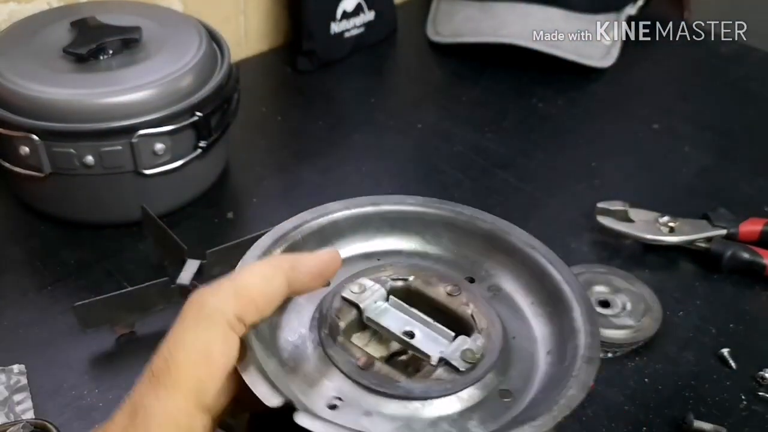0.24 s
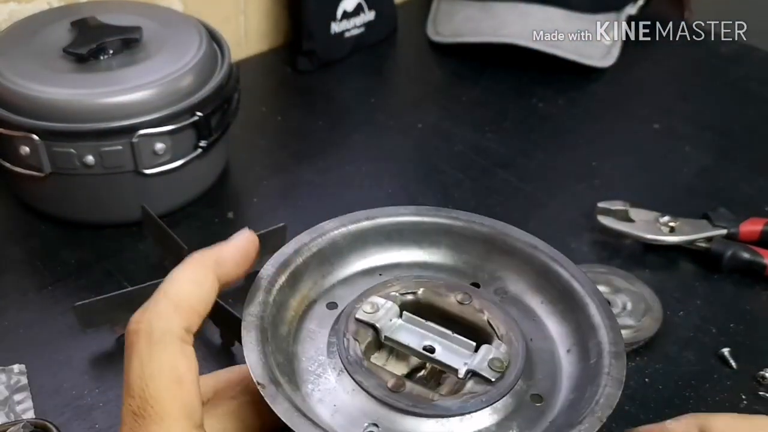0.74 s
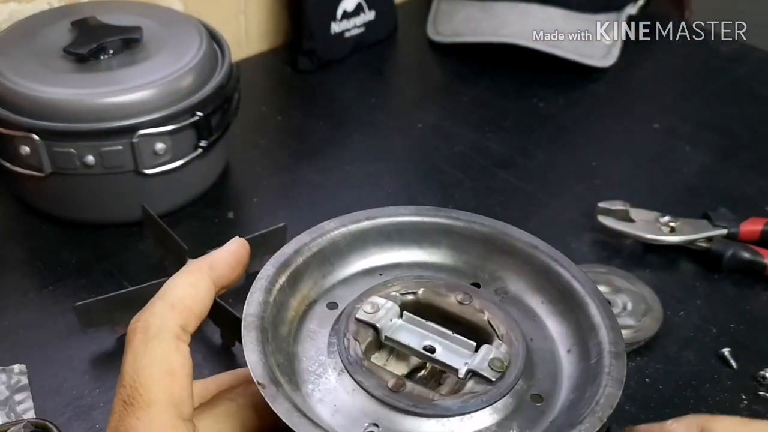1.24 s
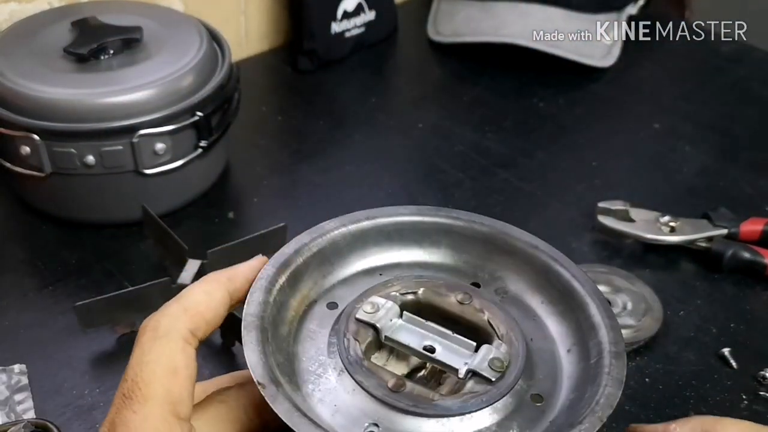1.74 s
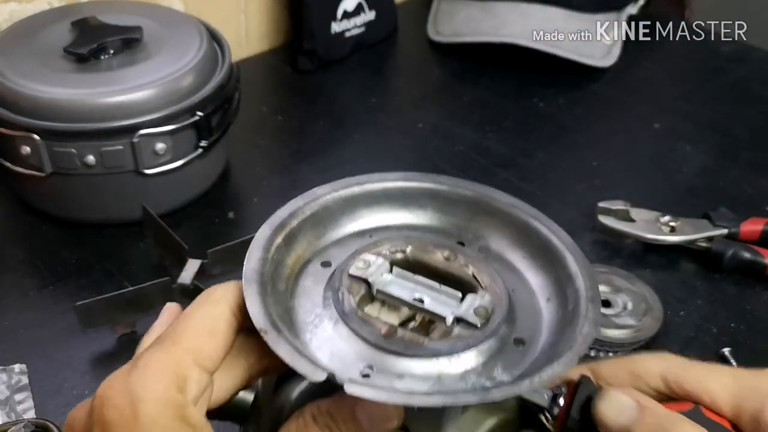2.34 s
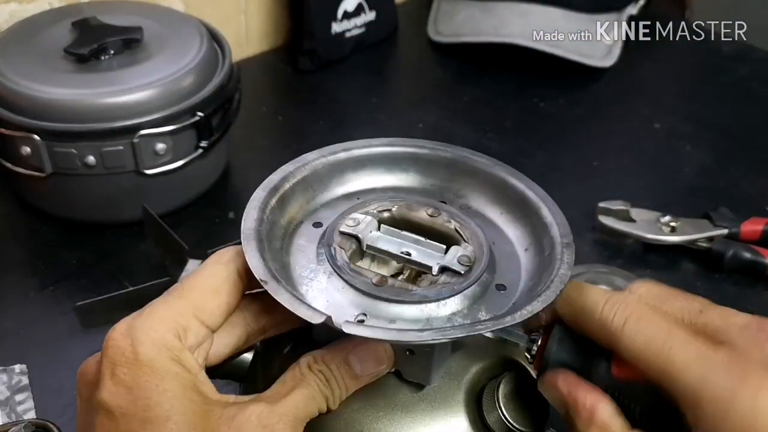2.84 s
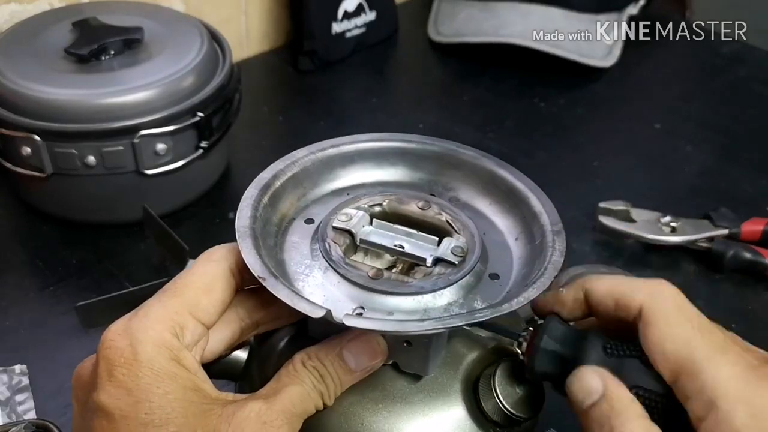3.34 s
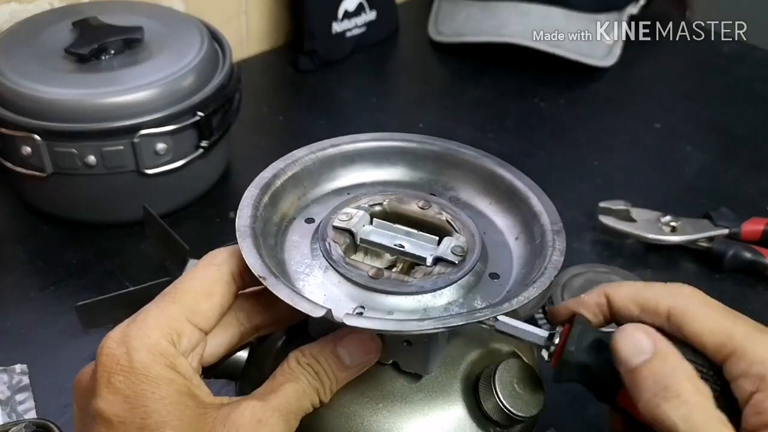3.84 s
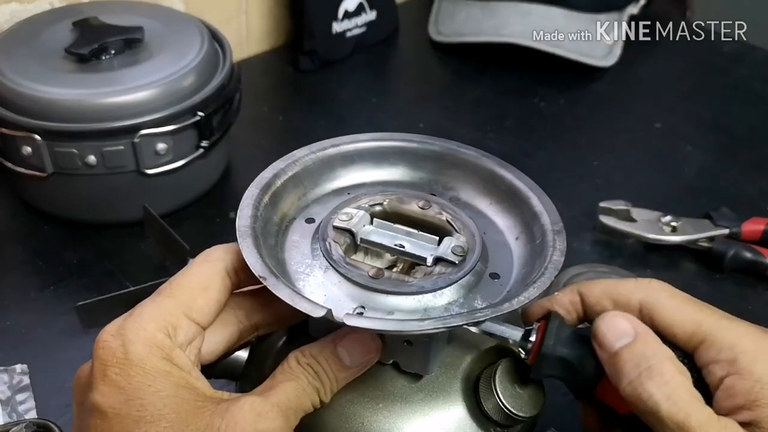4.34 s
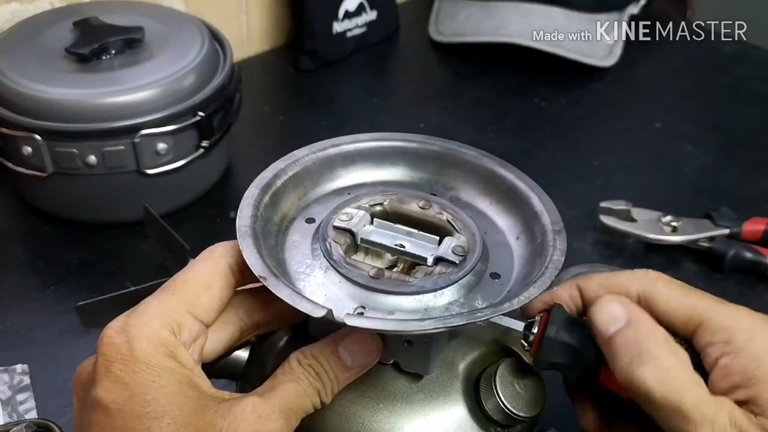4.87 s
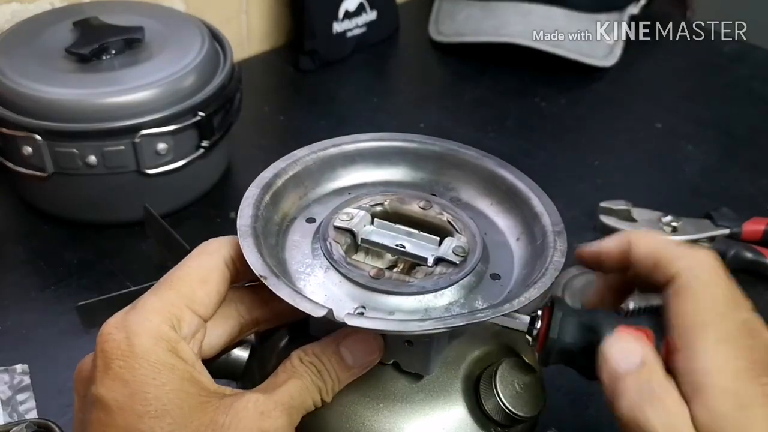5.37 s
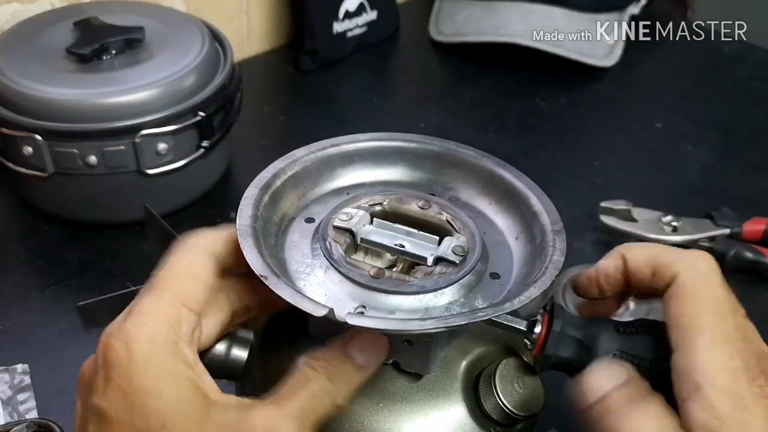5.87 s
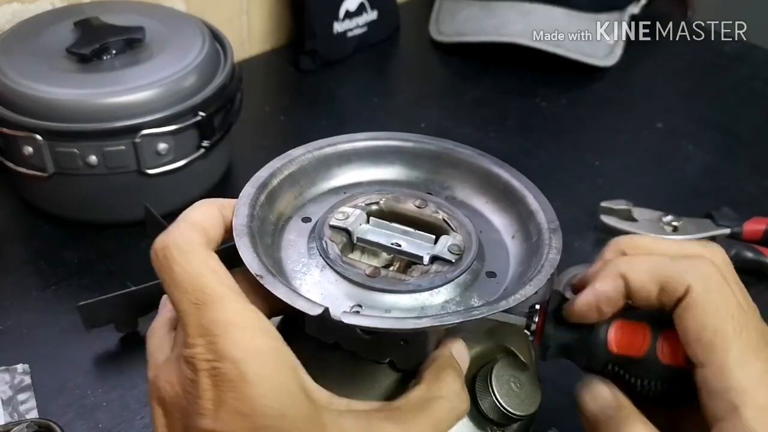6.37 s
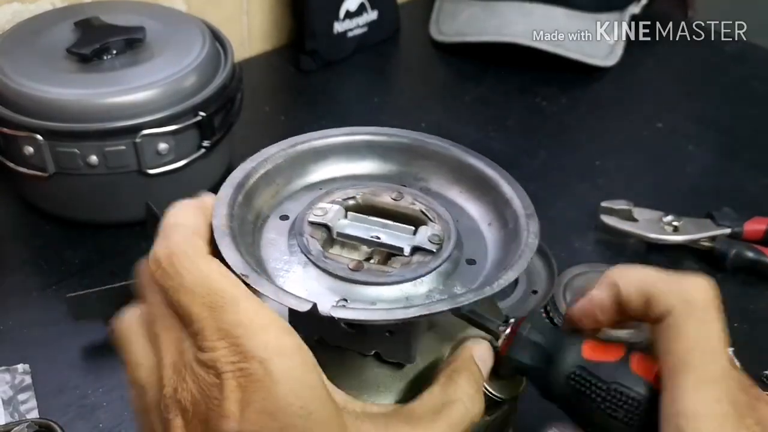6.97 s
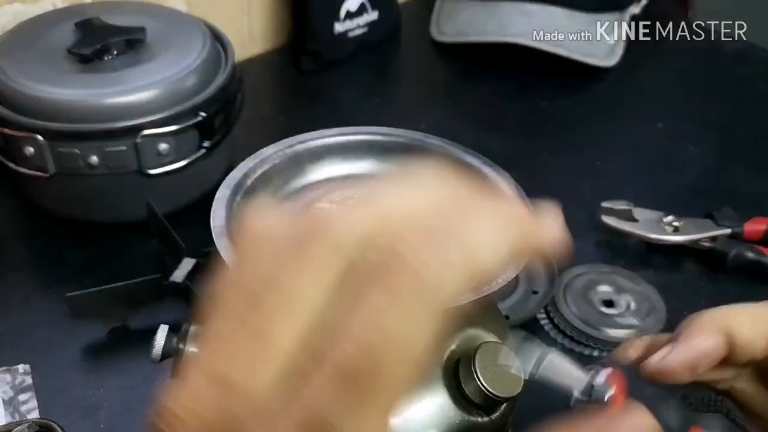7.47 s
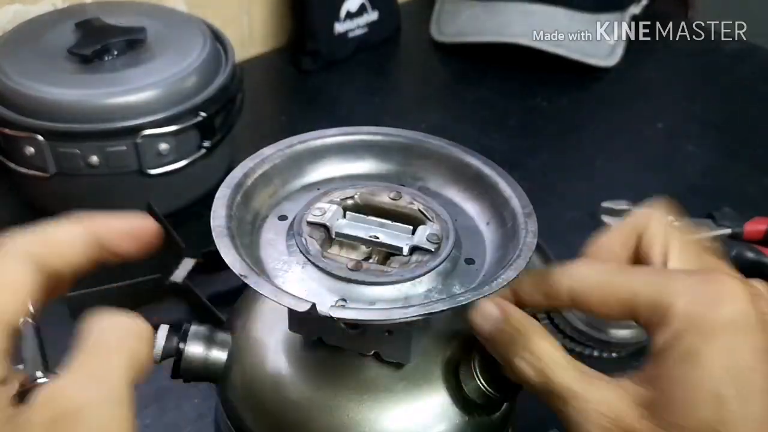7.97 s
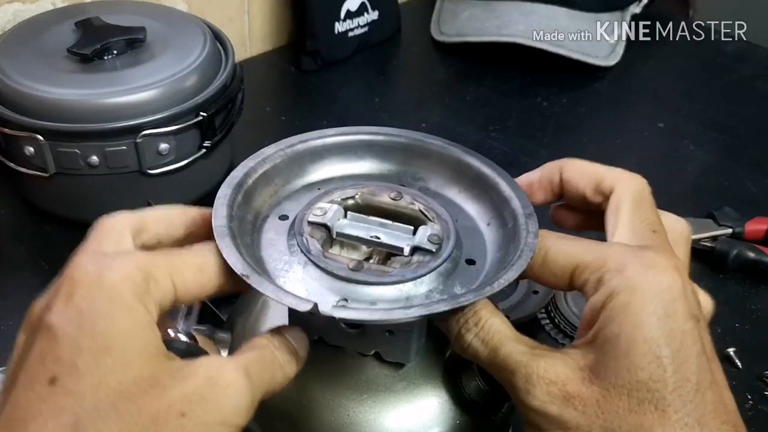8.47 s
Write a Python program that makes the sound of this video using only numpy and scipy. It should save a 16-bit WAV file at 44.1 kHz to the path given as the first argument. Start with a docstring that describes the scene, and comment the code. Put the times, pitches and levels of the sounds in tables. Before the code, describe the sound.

Close metal clinks, gritty rubs and soft low bumps of a camping stove being taken apart in a small room with a faint, deep hum.

```python
"""Hands rub and shift a camping stove over a deep, wavering drone and room noise; it is being taken apart.
A screwdriver taps and scrapes at a screw, knocks the steel burner bowl and clinks down among other tools,
one of which rings on, while the tank bumps the bench. Metal is short noise plus decaying sine modes,
rubbing is gritty filtered noise, bumps are low sines with noise, the drone is three harmonics plus low noise.
Decaying stereo noise gives the metal and the hands the echoes of a small room."""
import sys
import numpy as np
from scipy import signal
from scipy.fft import rfft, irfft, next_fast_len
from scipy.io import wavfile

SR = 44100
rng = np.random.default_rng(int(sys.argv[2]) if len(sys.argv) > 2 else 0)


def waveform_to_disk(signal):
    """Save audio, clipped to [-1, 1], as 16-bit WAV at the path in sys.argv[1]."""
    frames = np.transpose(np.atleast_2d(signal))
    scaled = np.clip(frames, -1, 1) * 32767
    samples = np.round(scaled).astype(np.int16)
    wavfile.write(sys.argv[1], SR, samples)


N = 384111
TIME = np.arange(N) / SR   # s

# swell of the deep drone, before its trim: t/s, level/dB
DRONE_LEVEL = [(0.0, -43), (0.09, -37.5), (0.65, -50), (1.4, -43.5), (1.82, -53.5), (3.0, -35), (4.24, -33),
               (5.14, -52), (5.91, -36), (6.83, -46), (8.63, -58.5), (8.7, -71.5)]
# glide of the drone's fundamental, before it wavers: t/s, f/Hz
DRONE_GLIDE = [(0, 31), (3.9, 33.2), (4.6, 33.85), (5.6, 38.09), (8.7, 40)]
# spectrum of the low room rumble: f/Hz, level/dB
RUMBLE_SPECTRUM = [(55, 1.5), (100, -2.5), (160, -5.0), (260, -11.5), (400, -25.5)]
# spectrum of the steady room noise: f/Hz, level/dB
AIR_SPECTRUM = [(50, -8), (160, -14), (280, -19.5), (450, -34.5), (1000, -28.5), (2200, -32.5),
                (4000, -45.5), (7000, -46.5), (15500, -59.5)]
# strokes of the hands shifting the stove: middle t/s, half length/s (one sigma), level/dB
HAND_STROKES = [(0.056, 0.086, -44.5), (0.392, 0.072, -53), (2.286, 0.1, -49.5), (2.578, 0.077, -45.5),
                (2.688, 0.048, -35.5), (5.168, 0.034, -56), (5.71, 0.046, -58), (7.013, 0.053, -46.5)]
# spectrum of the feet dragging on the bench: f/Hz, level/dB
DRAG_SPECTRUM = [(65, 3.5), (130, 3.5), (230, -1.5), (310, -4.5), (470, -11), (600, -21), (900, -9),
                 (1300, -18), (2200, -14.5), (3500, -34), (5000, -45)]
# spectrum of the fingers' hiss: f/Hz, level/dB
SKIN_SPECTRUM = [(2000, -5.5), (3500, -5), (5500, -4.5), (7600, 3.5), (10000, -10), (15000, -21)]
# low modes of the stove on its feet: f/Hz, level/dB
STAND_MODES = [(299, -3.5), (350, -9.5), (402, -1), (448, -3.5)]
# taps of the screwdriver on the screw: t/s, level/dB, contact time/s
SCREW_TAPS = [(0.601, -62.5, 0.0028), (3.129, -45.5, .005), (3.157, -30, 0.0027), (3.417, -53, 0.0034),
              (3.494, -40, 0.001), (3.563, -34, 0.00047), (3.74, -27, 0.00084), (4.287, -39, 0.0024),
              (4.33, -43, 0.0027), (4.474, -47, .0045), (4.661, -47.5, 0.0025), (6.599, -47, .0014)]
# modes of the screwdriver against the burner: f/Hz, level/dB, t60/s
BURNER_MODES = [(415, -12.5, 0.54), (882, -18.5, 0.069), (1978, -3.5, 0.12), (2205, -6, 0.14),
                (2750, 0, 0.1), (2928, 1, 0.093), (3490, -10.5, 0.15), (4940, -8.5, 0.073), (5540, 1, 0.05),
                (5800, -4.5, 0.14), (7100, -21, .1), (7030, 0, 0.084), (7770, -13.5, 0.3),
                (7870, -5, 0.099), (8910, -4, 0.091), (9300, -12, 0.14)]
# dense, short-lived modes of thin steel, as a noise spectrum: f/Hz, level/dB
CLATTER_SPECTRUM = [(200, 19), (400, 3.5), (620, -6), (880, 1), (1300, -13), (2000, -1.5), (2800, 4.5),
                    (4200, -6), (5500, -3), (6400, -4.5), (8500, -5.5), (11000, -10.5), (15500, -13.5)]
# knocks on the steel bowl: t/s, level/dB, contact time/s
BOWL_KNOCKS = [(0.938, -39.5, 0.0038), (1.244, -42.5, 0.0046), (1.354, -49, 0.006), (1.453, -48, 0.0041),
               (1.49, -47, 0.0018), (1.865, -29.5, 0.0025), (2.095, -56, 0.0019), (2.639, -43, 0.0018),
               (2.684, -47, 0.0046), (5.635, -56.5, 0.0026), (5.788, -43, 0.0022), (6.412, -50.5, 0.0066),
               (6.932, -57.5, .0012)]
# modes of the bowl: f/Hz, level/dB, t60/s
BOWL_MODES = [(349.6, -9, 0.3), (871, 0.5, 0.063), (1930, -11.5, 0.19), (2270, -9, 0.075),
              (2810, 2.5, 0.045), (3210, -12, 0.17), (3182, 4, 0.063), (3860, -13, 0.06),
              (4600, -17, 0.037), (5330, 0.5, 0.045), (5460, -40, 0.088), (5570, -5, 0.11),
              (6930, -6.5, 0.072), (7600, -11, 0.12), (8280, -28, 0.068), (9700, -13, 0.063)]
# the blade sliding over steel: start t/s, length/s, level/dB, treble/dB (gain above the dull part)
BLADE_SCRAPES = [(1.13, 0.057, -49, -27), (3.069, .06, -57.5, -6), (3.273, .088, -52, 12.5),
                 (3.49, 0.077, -35, -4.5), (3.694, 0.038, -35.5, -3.5), (4.457, .04, -57, -12),
                 (4.729, .07, -59.5, -15), (5.08, .117, -61, -28), (6.003, .115, -62, 15),
                 (7.075, 0.065, -47, 13.5), (7.206, 0.048, -45, 6.5), (7.4, 0.04, -33.5, -2.5),
                 (7.439, 0.043, -24.5, -4)]
# soft bumps of the tank on the bench: t/s, level/dB, f/Hz
TANK_BUMPS = [(1.247, -31.5, 318), (1.868, -27, 169.4), (2.139, -26, 141), (2.636, -23, 347),
              (2.679, -25, 289.5), (3.16, -19, 157.4), (3.232, -22.5, 158.8), (3.567, -27.5, 166),
              (3.741, -33.5, 395), (5.67, -31.5, 198), (6.416, -36.5, 252), (6.597, -29.5, 181),
              (7.111, -28.5, 147), (7.227, -22.5, 169.8), (7.69, -34, 83), (7.87, -39, 82)]
# the pulled-out screwdriver clinking on the stove and the tools: t/s, level/dB, contact time/s
SHAFT_CLINKS = [(7.106, -41.5, 0.00084), (7.207, -42.5, 0.00035), (7.294, -48, 0.00058),
                (7.388, -20.5, 0.00098), (7.934, -64.5, 0.00053)]
# modes of the free screwdriver: f/Hz, level/dB, t60/s
SHAFT_MODES = [(778, 2, 0.064), (1700, 4.5, 0.044), (1820, -10.5, 0.19), (2340, -6.5, .15),
               (2830, -16, 0.14), (3340, 3, 0.07), (5370, -4, .08), (7680, -6, 0.29), (9160, -5.5, 0.15),
               (11860, -8.5, 0.029)]
# modes of a steel tool ringing freely: f/Hz, level/dB, t60/s
TOOL_MODES = [(1821, -34, 0.34), (2180, -38, 0.52), (2970, -41.5, 0.44), (3180, -29.5, 0.58),
              (4307, -19, 0.7), (4306, -45, 1.4), (5114, -44, .4), (5560, -12, 0.19), (6901, -38, 0.44),
              (7400, -31, 0.29), (8631, -29.5, 0.48)]
# decay time of the small room: f/Hz, t60/s
ROOM_DECAY = [(150, 0.79), (800, 0.7), (2500, 0.53), (6000, 0.5), (10000, 0.37), (15000, 0.43)]

USUAL_BLOW_DB = -45.5   # the level at which the tone of a blow is given
BODY_FOLLOWS = 0.54   # dB of low body per dB of blow: light touches sound rounder
SNAP_DB_S = 0.0048   # treble gained, divided by the contact time: short contacts are bright
MIN_CONTACT_S = 0.0004   # shorter contacts are lengthened to this
BUMP_T60_S = 0.15
SCRAPE_FADE = 0.23   # share of a scrape spent in swelling and fading
USUAL_STROKE_DB = -47.5   # the level at which the hiss of the skin is given
SKIN_FOLLOWS = 1   # dB of skin hiss per dB of stroke
RUMBLE_FOLLOWS = 0.31   # share of the drone's swing that the low room rumble follows
TOOL_STRUCK_S = 7.445
CUTOFF_HZ = 16000


def from_db(db):
    """Turn decibels into an amplitude factor."""
    return 10 ** (np.asarray(db) / 20)


def rms_one(x):
    """Scale a signal to rms 1."""
    return x / np.sqrt(np.mean(x ** 2) + 1e-20)


def dying(t, t60):
    """Exponential decay, down 60 dB after t60 seconds."""
    return from_db(-60 * t / max(t60, .002))


def at_hz(points, hz):
    """Read a table at any frequency, interpolating over log frequency."""
    f, value = np.transpose(points)
    return np.interp(np.log(np.maximum(hz, 1)), np.log(f), value)


def band(x, hz, kind, order=2):
    """Butterworth filter."""
    return signal.sosfilt(signal.butter(order, hz, kind, fs=SR, output="sos"), x)


def add(track, s, sound):
    """Mix a sound in from time s."""
    i = max(int(s * SR), 0)
    track[:, i:i + sound.shape[-1]] += sound[..., :N - i]


def pan(right_db):
    """Tilt the balance: the right gains right_db and the left loses as much."""
    return from_db([[-right_db], [right_db]])


def colour(x, spectrum):
    """Give a steady signal a spectrum that falls away steeply at both ends; rms 1."""
    size = next_fast_len(x.shape[-1])
    hz = np.arange(size // 2 + 1) * SR / size + 0.0012   # offset avoids dividing by zero
    low_end = 1 + (.8 * spectrum[0][0] / hz) ** 6
    high_end = 1 + (.8 * hz / spectrum[-1][0]) ** 6
    gain = from_db(at_hz(spectrum, hz)) / low_end / high_end
    return rms_one(irfft(rfft(x, size) * gain, size)[..., :x.shape[-1]])


def stereo_noise(size, apart_hz=420):
    """Long waves reach both microphones alike, short ones differ."""
    mid, side = rng.standard_normal((2, size))
    return rms_one(mid + band(side, apart_hz, "high") * [[1], [-1]])


def grit(size, rough_db, per_s):
    """Uneven random level or speed, such as the grip of a sliding contact; rms 1."""
    knots = np.arange(size) * per_s / SR
    steps = np.clip(rng.standard_normal(N), -2.5, 2.5)
    return rms_one(from_db(rough_db * np.interp(knots, np.arange(N), steps)))


def background(drone_db=-1.0, rumble_db=-50, air_db=-57.0, overtone_db=-17):
    """A wavering drone, like an engine far outside, a rumble swelling along with it, steady room noise."""
    level_db = np.interp(TIME, *np.transpose(DRONE_LEVEL))
    pitch = np.interp(TIME, *np.transpose(DRONE_GLIDE)) * grit(N, rough_db=0.37, per_s=23)
    phase = 2 * np.pi * np.cumsum(pitch) / SR
    overtones = np.sin(2 * phase) + 0.54 * np.sin(3 * phase)
    tone = rms_one(np.sin(phase) + from_db(overtone_db) * overtones)
    throb = rms_one(band(rng.standard_normal(N), [22, 50], "band"))
    drone = (tone + 0.56 * throb) * from_db(drone_db + level_db)
    rumble = colour(stereo_noise(N), RUMBLE_SPECTRUM) * grit(N, rough_db=4.0, per_s=14)
    rumble = rumble * from_db(rumble_db + RUMBLE_FOLLOWS * (level_db - level_db.mean()))
    return drone + rumble + from_db(air_db) * colour(stereo_noise(N), AIR_SPECTRUM)


def resonate(x, modes, sharpness):
    """Noise keeps a set of modes sounding through narrow resonant filters; rms 1."""
    return rms_one(sum(from_db(db) * signal.lfilter(*signal.iirpeak(hz, hz / sharpness, fs=SR), x)
                       for hz, db, *_ in modes))


def handling(drag_db=0, skin_db=-57.5, stand_db=-3):
    """The feet judder over the bench and set the stove humming; fingers hiss unevenly along the bowl."""
    judder = stereo_noise(N) * grit(N, rough_db=3.0, per_s=170)
    hum = resonate(judder, STAND_MODES, sharpness=14)
    drag = colour(judder, DRAG_SPECTRUM) + from_db(stand_db) * hum
    rub = stereo_noise(N) * grit(N, rough_db=1.5, per_s=310) * grit(N, rough_db=3.0, per_s=30)
    skin = colour(rub, SKIN_SPECTRUM)
    out = np.zeros((2, N))
    for s, half_s, level_db in HAND_STROKES:
        stroke = np.exp(-((TIME - s) / half_s) ** 2 / 2)
        hiss_db = skin_db + SKIN_FOLLOWS * (level_db - USUAL_STROKE_DB)
        out += stroke * (drag * from_db(drag_db + level_db) + skin * from_db(hiss_db))
    return out * pan(-1.1)


def blows(table, modes, ring_db, tone_db, spread_db, wide, contact_t60, top_hz, grip):
    """Dense modes clatter briefly and clear ones ring; force and contact time tilt body, middle, treble."""
    out, t = np.zeros((2, N)), np.arange(SR // 3) / SR
    steel = colour(stereo_noise(N), CLATTER_SPECTRUM)
    first = t < .02   # each part's level is set over its first 20 ms
    for s, blow_db, contact_s in table:
        contact_s = max(contact_s, MIN_CONTACT_S)
        body_db = USUAL_BLOW_DB + BODY_FOLLOWS * (blow_db - USUAL_BLOW_DB)
        levels_db = np.add(tone_db, [body_db, blow_db, blow_db + SNAP_DB_S / contact_s])
        start = rng.integers(N - len(t))
        # long contacts, as in glancing blows, clatter longer
        hit = steel[:, start:start + len(t)] * dying(t, contact_t60 + 4 * contact_s)
        for hz, level_db, t60 in modes:
            side_shift = rng.normal(1.03, 0.72) * min(hz / 800, 1)
            phase = rng.uniform(0, 2 * np.pi) + np.array([[0], [side_shift]])
            pitch = hz * (1 + grip * rng.normal())   # the grip shifts the modes a little
            level = from_db(ring_db + level_db + spread_db * rng.normal())
            hit += level * dying(t, t60) * np.sin(2 * np.pi * pitch * t + phase)
        hit = hit * np.minimum(t / contact_s, 1)
        # the sheet's two faces radiate in opposite phase, so the shared treble is thinned
        hit = hit - wide * band(hit.mean(0), 3023, "high", order=1)
        # brighter blows, hard or short, keep more of the top
        hit = band(hit, np.clip(top_hz * from_db((levels_db[2] + 40.5) / 7), 3000, 19000), "low")
        body = band(hit, [250, 1200], "band", order=3)
        middle = band(hit, [1400, 4200], "band", order=3)
        treble = band(hit, 4700, "high", order=3)
        for part, level_db in zip((body, middle, treble), levels_db):
            add(out, s, from_db(level_db) * part / part[:, first].std())
    return out


def screw_taps():
    """The screwdriver taps the screw and sounds the burner with it."""
    return blows(SCREW_TAPS, BURNER_MODES, ring_db=-15.0, tone_db=(-5, 1, -4), spread_db=5,
                 wide=0.18, contact_t60=0.049, top_hz=9050, grip=.004)


def bowl_knocks():
    """The screwdriver knocks the steel bowl and its modes ring."""
    return blows(BOWL_KNOCKS, BOWL_MODES, ring_db=-9.5, tone_db=(-1.5, 1, -4.5), spread_db=2.5,
                 wide=0.086, contact_t60=0.055, top_hz=7800, grip=.012)


def scrapes(ring_db=0, rough_db=3.5):
    """Tiny slips of the blade keep the steel and its modes sounding."""
    slips = stereo_noise(N) * grit(N, rough_db, per_s=330)
    rings = resonate(slips, BURNER_MODES, sharpness=70)
    steel = band(colour(slips, CLATTER_SPECTRUM) + from_db(ring_db) * rings, [1100, 10500], "band")
    dull = band(steel, 3100, "low", order=1)
    out = np.zeros((2, N))
    for start, length_s, level_db, treble_db in BLADE_SCRAPES:
        i, size = int(start * SR), max(int(length_s * SR), 64)
        stroke = (dull + from_db(treble_db) * (steel - dull))[:, i:i + size]
        add(out, start, from_db(level_db) * rms_one(stroke) * signal.windows.tukey(size, SCRAPE_FADE))
    return out


def bumps():
    """The fuel tank rocks on the bench with a dull, low ring."""
    out, t = np.zeros((2, N)), np.arange(SR // 2) / SR
    soft_start = 1 - np.exp(-t / 0.0097)
    for s, level_db, hz in TANK_BUMPS:
        thud = rms_one(band(rng.standard_normal(len(t)), [70, 300], "band", order=3))
        swing = np.sin(2 * np.pi * hz * t) + 0.45 * thud
        add(out, s, from_db(level_db) * swing * dying(t, BUMP_T60_S) * soft_start)
    return out


def shaft_clinks():
    """The free screwdriver clinks on the stove and among the tools, its own shaft ringing."""
    return blows(SHAFT_CLINKS, SHAFT_MODES, ring_db=-12.5, tone_db=(-8, 1, -7.5), spread_db=2,
                 wide=0.17, contact_t60=0.053, top_hz=17000, grip=.0007)


def ringing_tool(swell_s=0.089, sway_hz=3.2, sway=0.11):
    """The ring swells as the tool comes free and sways between the sides as it rocks."""
    t = np.maximum(TIME - TOOL_STRUCK_S, 0)
    swell = 1 - np.exp(-t / swell_s)   # silent until the tool is struck
    sides = np.array([[0], [1.4]])   # phase of left and right, radians
    ring = sum(from_db(db) * dying(t, t60) * np.sin(2 * np.pi * hz * t + sides) for hz, db, t60 in TOOL_MODES)
    return ring * swell * (1 + sway * np.sin(2 * np.pi * sway_hz * t) * [[1], [-1]])


def room(x):
    """Diffuse echoes of a small room, dying band by band."""
    t = np.arange(SR * 2 // 3) / SR
    edges = np.geomspace(100, 16000, 11)   # Hz
    tail = np.zeros((2, len(t)))
    for lo, hi in zip(edges, edges[1:]):
        tail += band(stereo_noise(len(t)), [lo, hi], "band") * dying(t, at_hz(ROOM_DECAY, np.sqrt(lo * hi)))
    tail = tail * (1 - np.exp(-(t / 0.0043) ** 2))   # echoes build up over the first milliseconds
    return signal.fftconvolve(x, rms_one(tail) / np.sqrt(len(t)), axes=-1)[:, :N]


def scene():
    """Metal and hands sound close by in the small room, over the drone and the room noise."""
    backdrop = background()
    hands = handling() + bumps()
    screwdriver = screw_taps() + scrapes() + shaft_clinks()
    metal = bowl_knocks() * pan(1.3) + screwdriver * pan(.6)
    echoes = from_db(-9.5) * room(metal) + from_db(-12.0) * room(hands)
    return metal + hands + echoes + ringing_tool() + backdrop


def record(dry):
    """The top is cut steeply by an elliptic low-pass filter."""
    return signal.sosfilt(signal.ellip(10, .2, 70, CUTOFF_HZ, fs=SR, output="sos"), dry)


dry = scene()
out = record(dry)
waveform_to_disk(out)
```